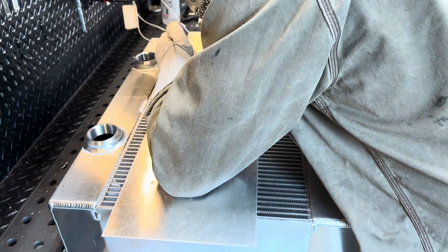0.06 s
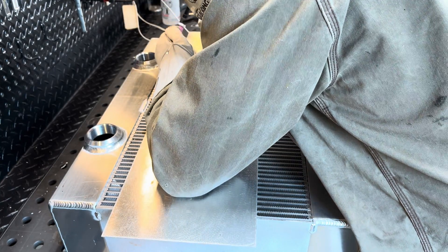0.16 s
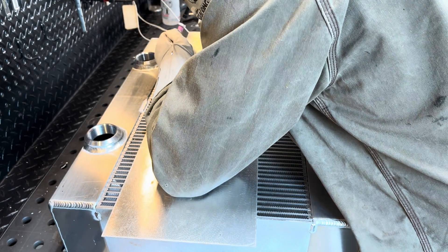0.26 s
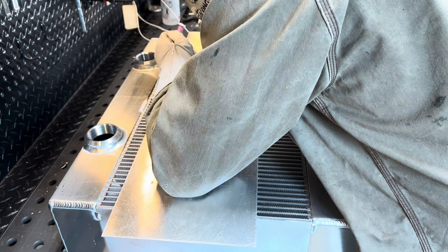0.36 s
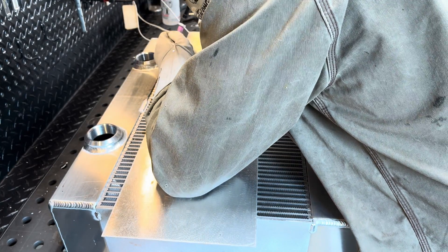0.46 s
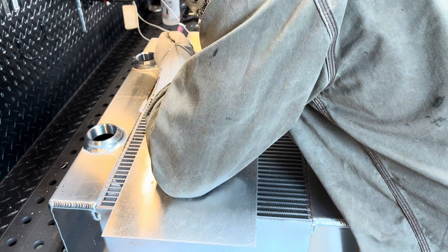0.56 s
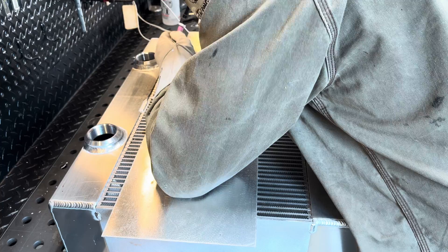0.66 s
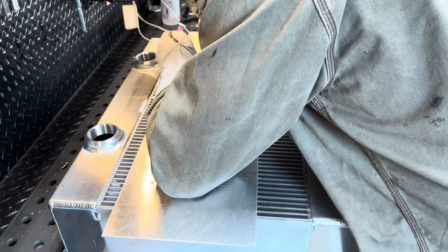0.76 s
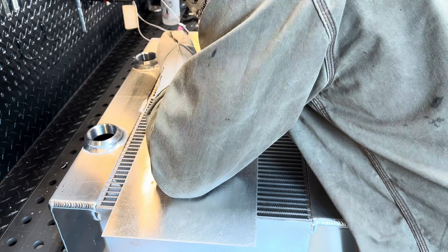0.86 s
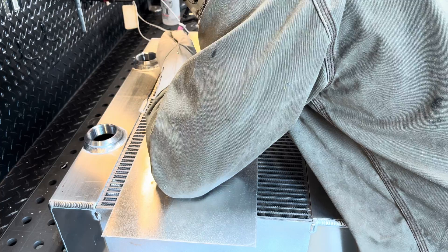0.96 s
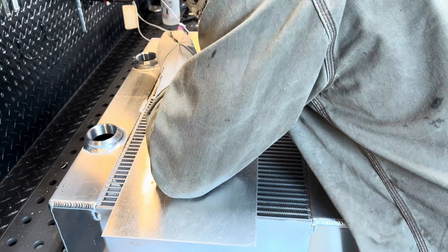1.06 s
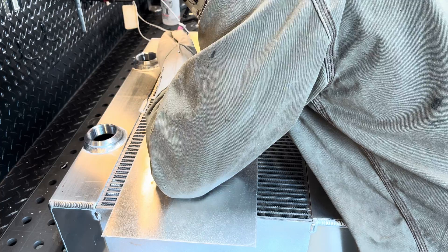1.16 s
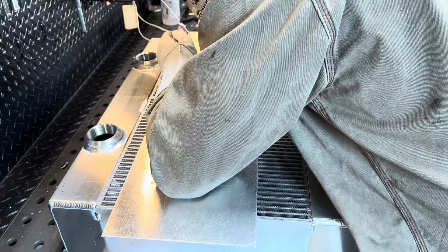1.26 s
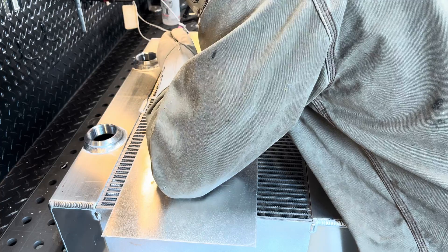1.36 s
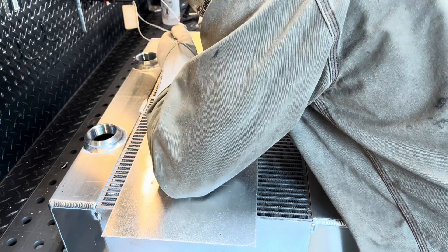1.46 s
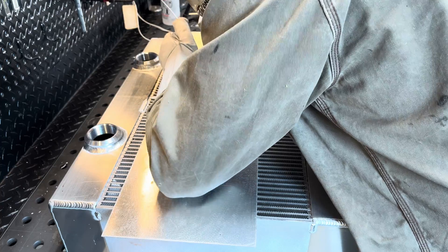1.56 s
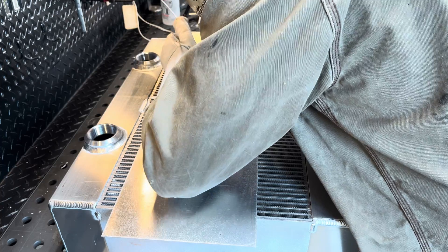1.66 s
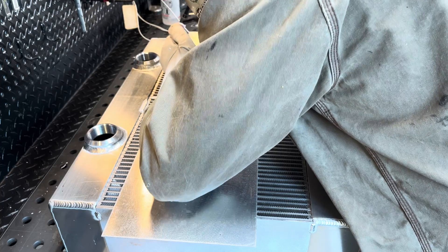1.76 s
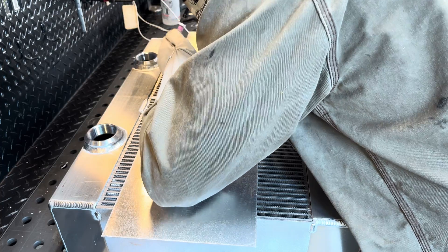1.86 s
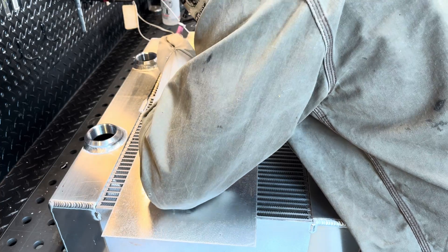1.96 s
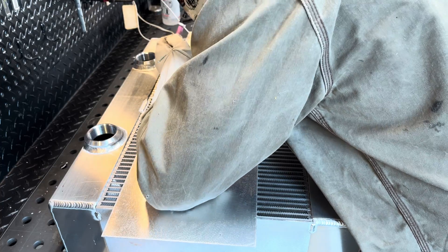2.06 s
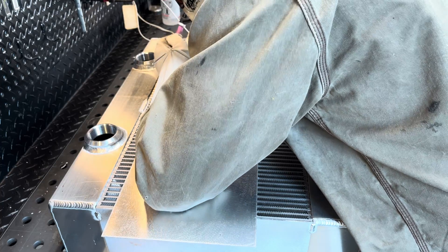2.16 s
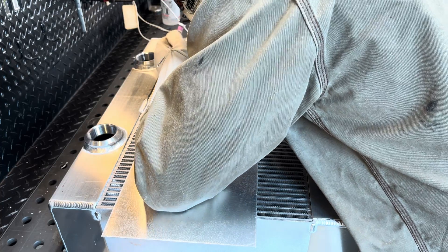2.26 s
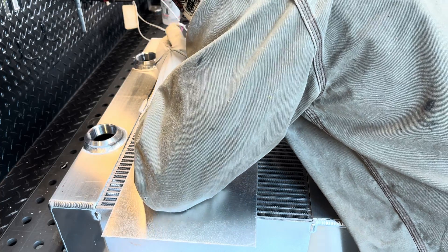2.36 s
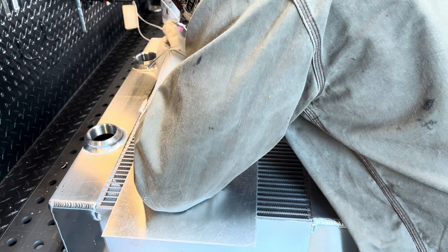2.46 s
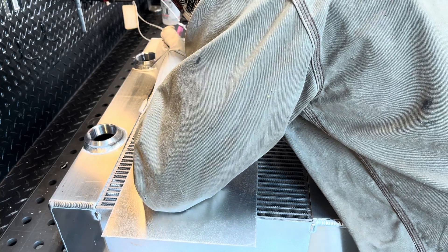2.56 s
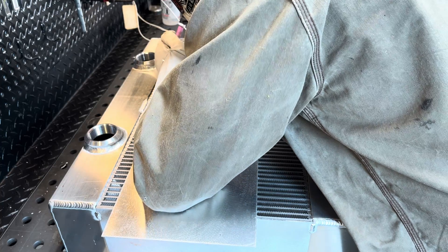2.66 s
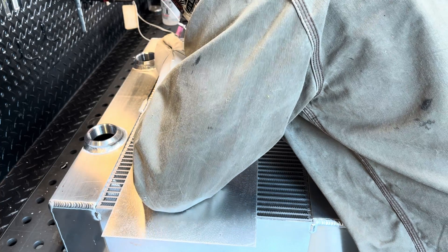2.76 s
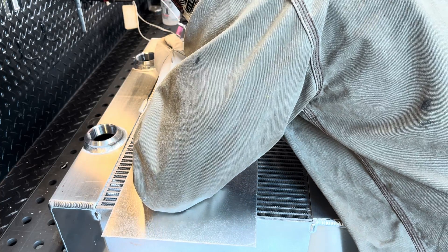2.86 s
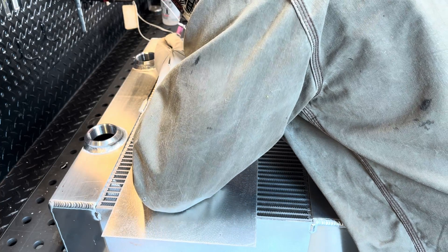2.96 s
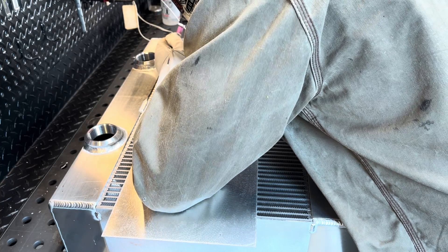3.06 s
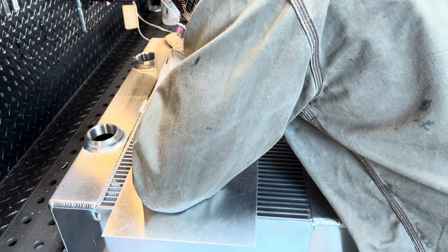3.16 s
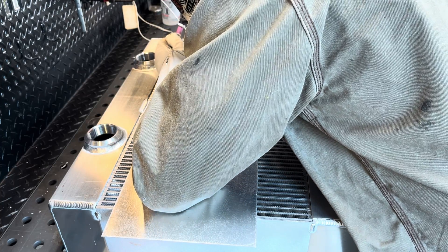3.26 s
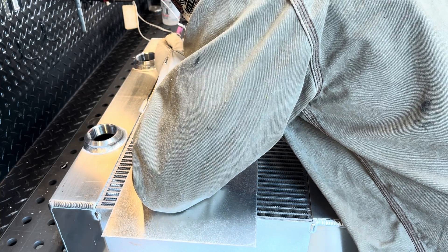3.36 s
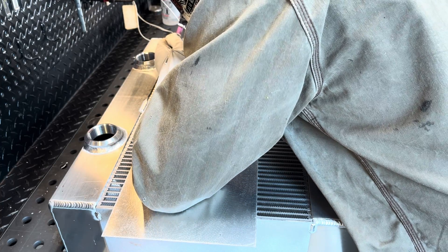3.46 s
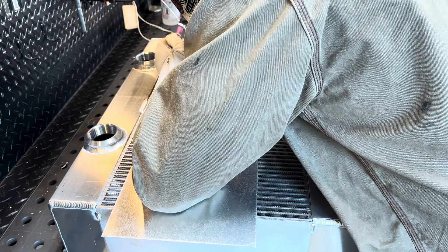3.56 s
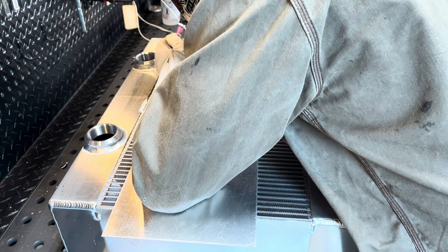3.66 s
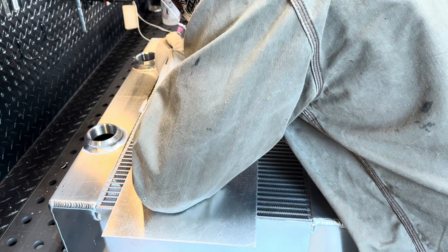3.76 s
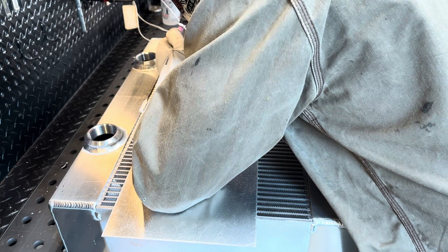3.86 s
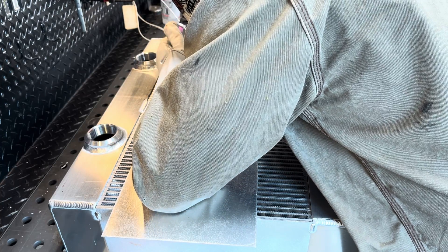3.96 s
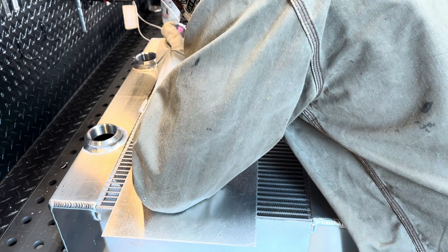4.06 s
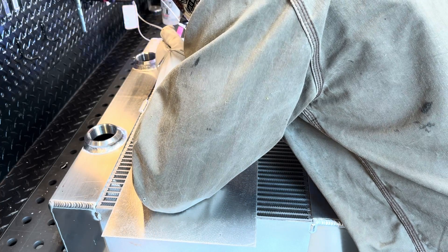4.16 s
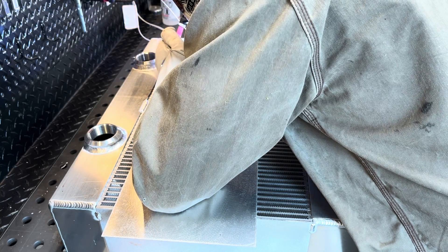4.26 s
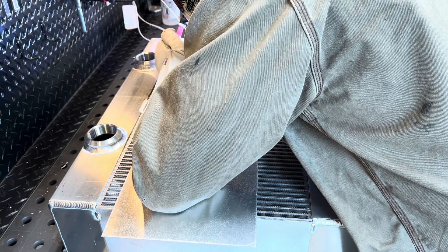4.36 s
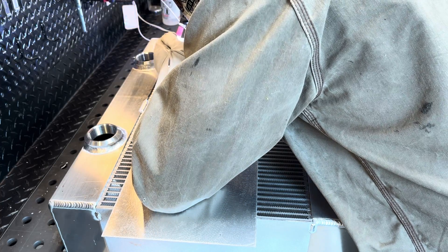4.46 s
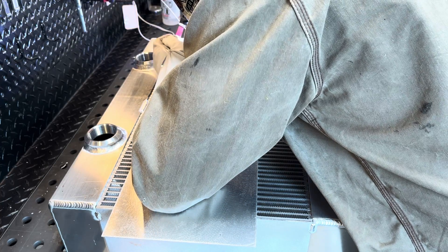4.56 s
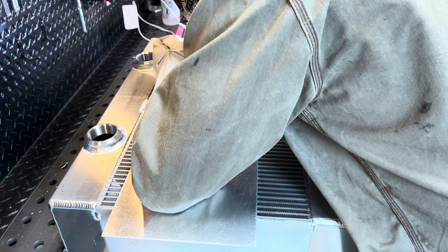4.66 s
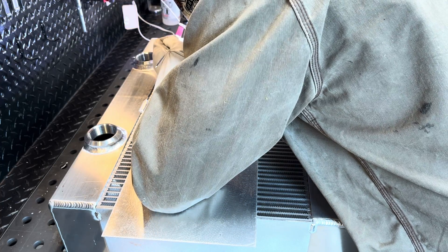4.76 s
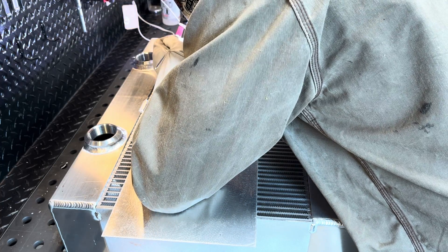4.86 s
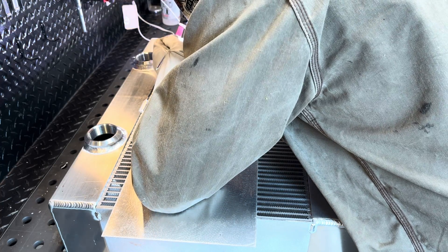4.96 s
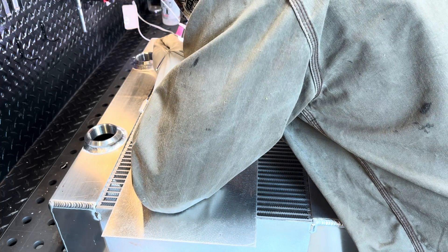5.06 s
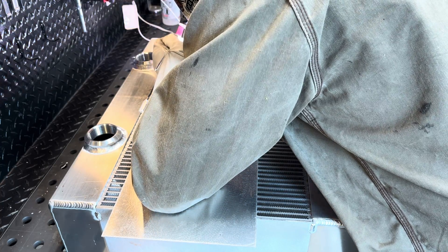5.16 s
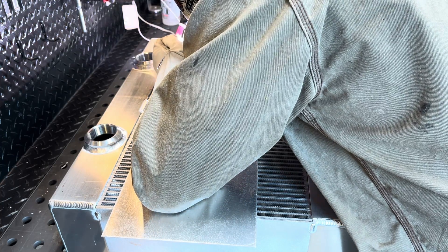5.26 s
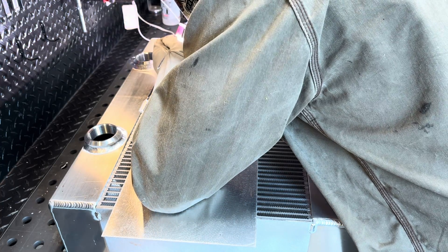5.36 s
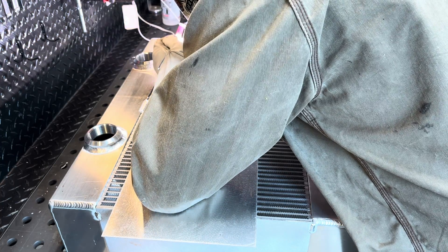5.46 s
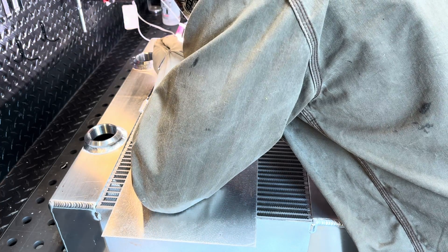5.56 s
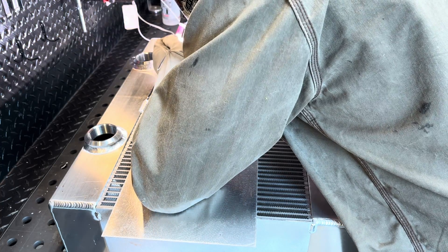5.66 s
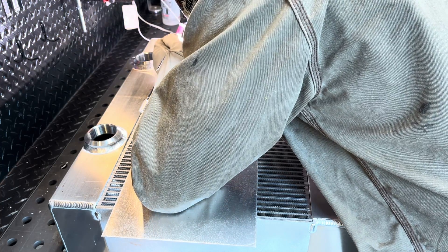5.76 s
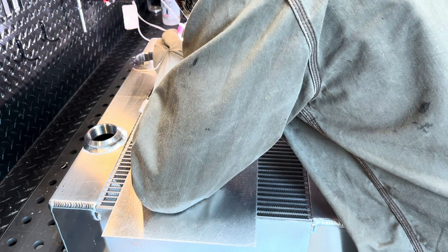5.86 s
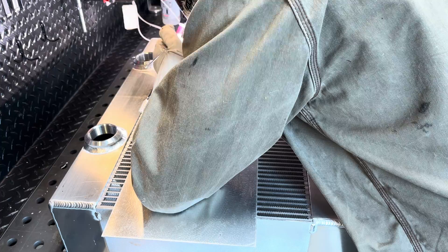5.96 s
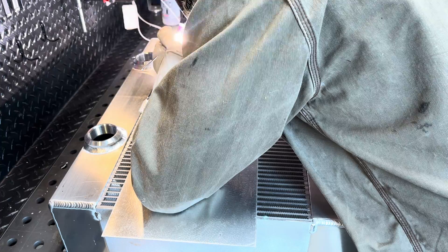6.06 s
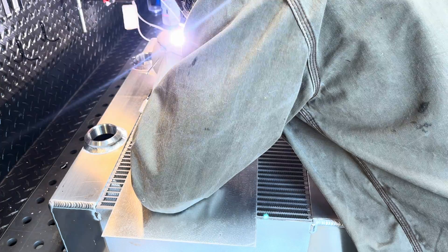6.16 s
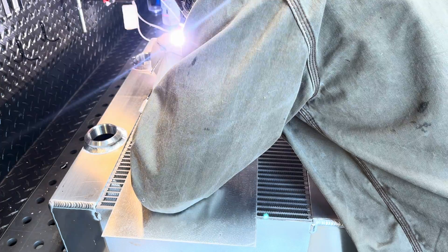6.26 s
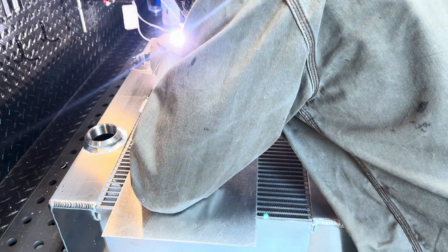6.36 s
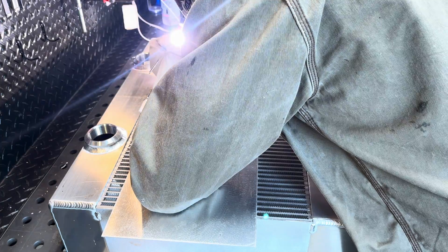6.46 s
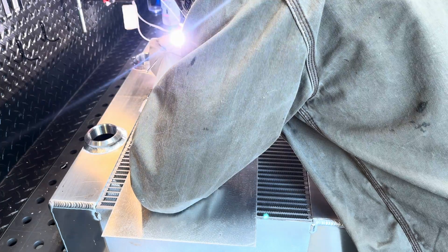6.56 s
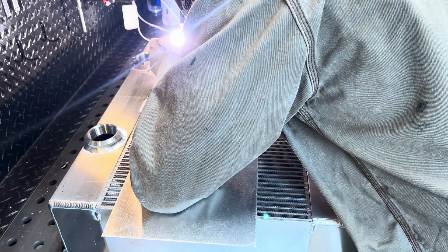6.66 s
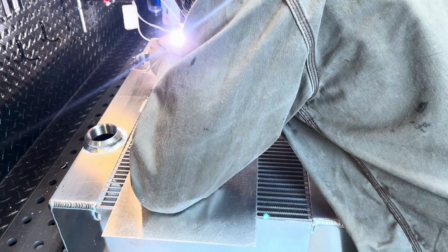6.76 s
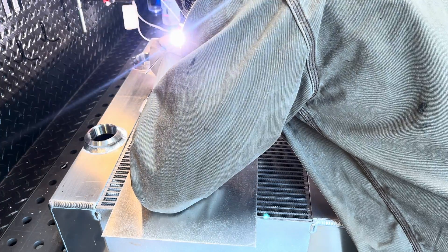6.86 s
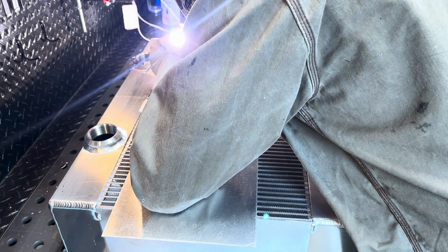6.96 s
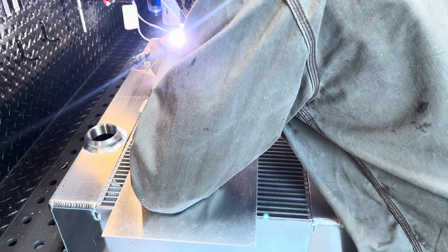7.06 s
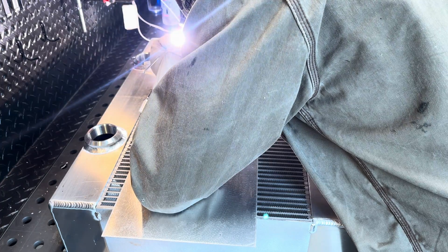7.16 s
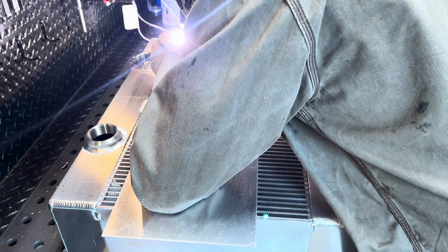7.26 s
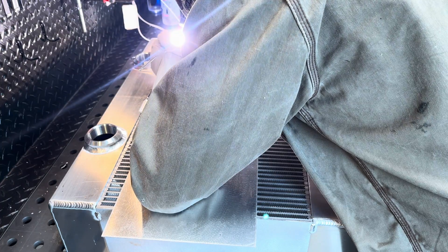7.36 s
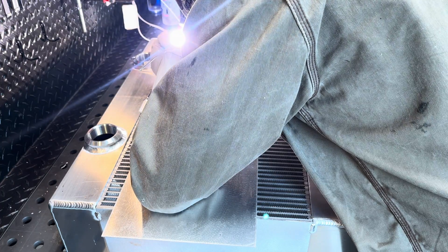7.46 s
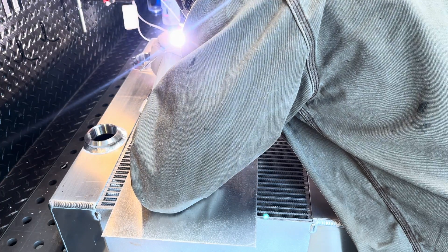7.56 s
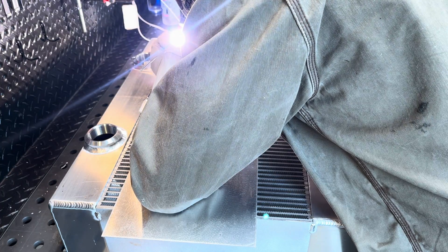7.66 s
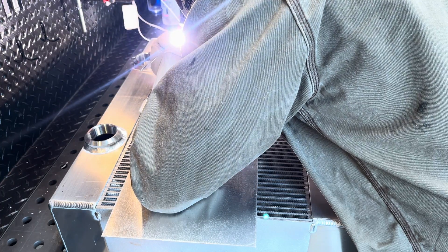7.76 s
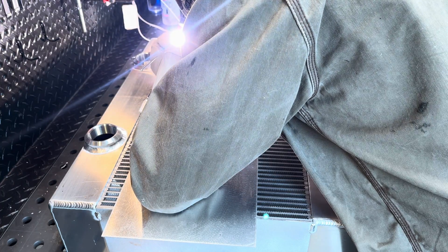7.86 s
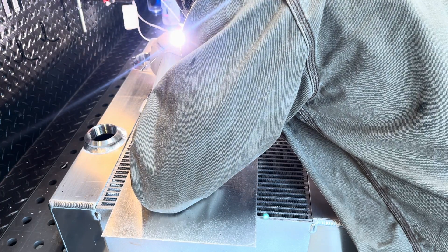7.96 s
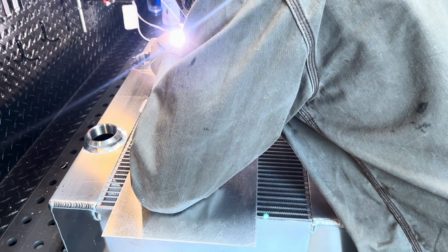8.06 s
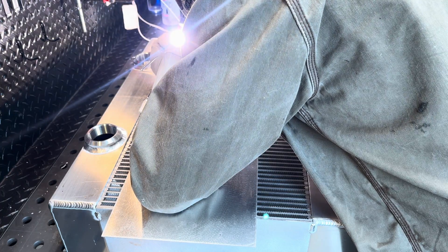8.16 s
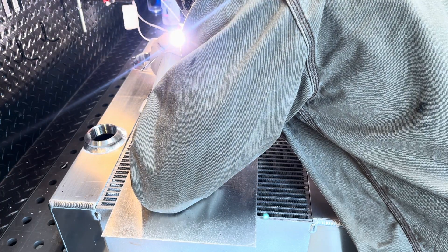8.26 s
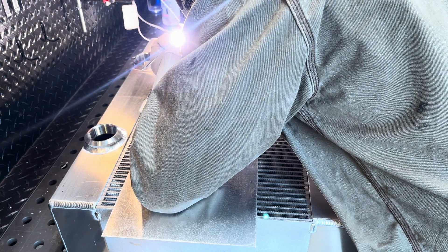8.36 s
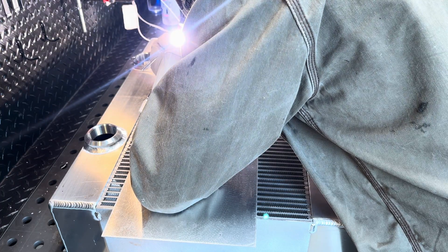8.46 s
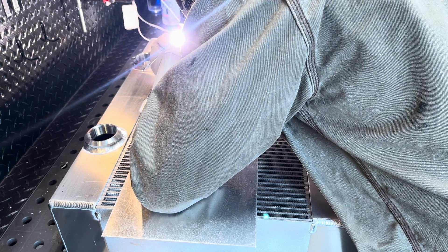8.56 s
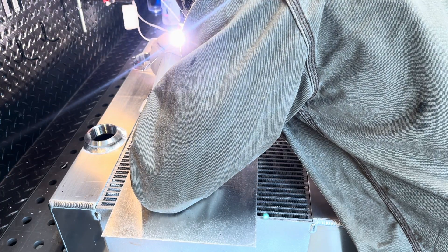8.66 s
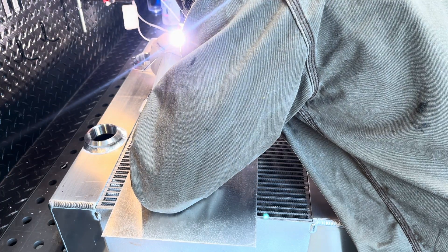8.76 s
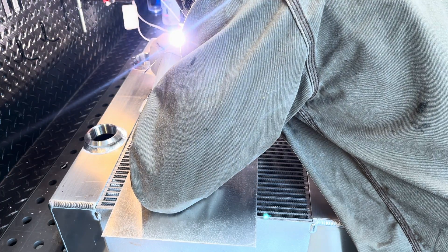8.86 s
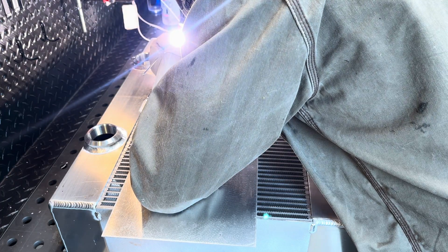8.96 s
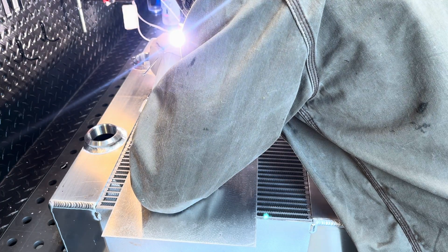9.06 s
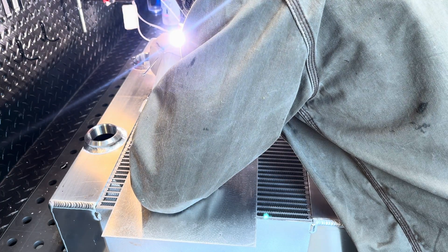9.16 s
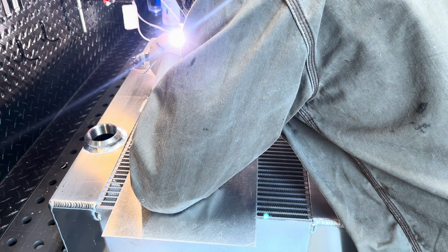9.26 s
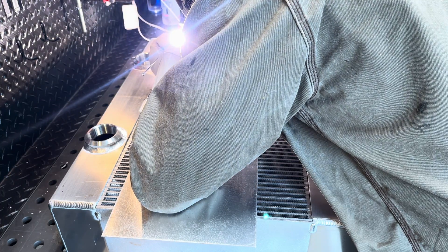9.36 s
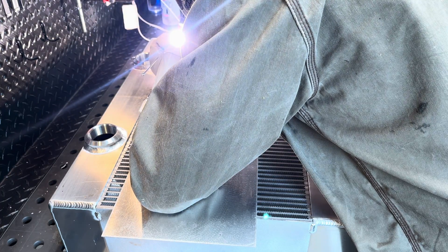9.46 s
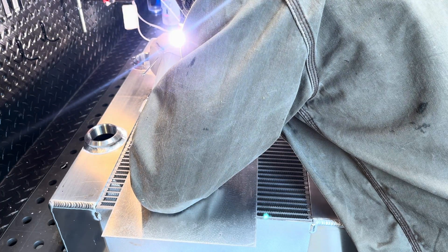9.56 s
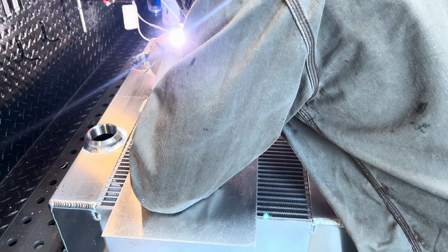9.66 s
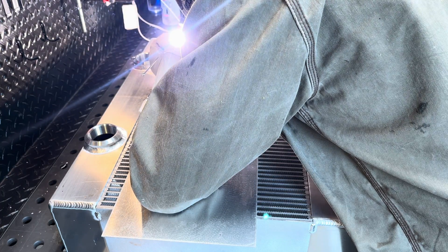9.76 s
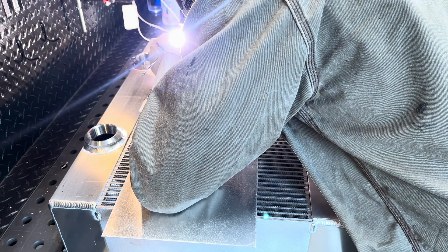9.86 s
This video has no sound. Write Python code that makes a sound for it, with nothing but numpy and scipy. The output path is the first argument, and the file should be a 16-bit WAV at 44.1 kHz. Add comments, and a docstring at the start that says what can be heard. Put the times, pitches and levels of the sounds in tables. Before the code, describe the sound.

A welding machine hums with fan air and a gas hiss, then sparks crackle and an arc catches into a harsh, loud, high buzz.

```python
"""An AC welding arc on an aluminium tank: it snaps at both polarity reversals of each cycle, over a thrum and sizzle.
The snaps echo off the metal close by, and the arc grows louder and harder as the weld pool heats up.
One pop and a burst of ignition sparks, cracks and thumps of heated air, come before it.
Earlier, shielding gas starts to hiss through the resonances of the torch cup, and torch and rod tick faintly.
Behind it all the machine hums with steady and wavering tones, and its fan blows noisy air."""
import sys
import numpy as np
from scipy import signal
from scipy.fft import rfft, irfft, next_fast_len
from scipy.io import wavfile
from scipy.ndimage import uniform_filter1d, map_coordinates

SR = 44100
rng = np.random.default_rng(int(sys.argv[2]) if len(sys.argv) > 2 else 0)


def put_to_file(sound):
    """Save the sound as 16-bit audio at rate SR, in the file named by the first command-line argument."""
    columns = np.atleast_2d(sound).T  # one column per channel
    safe = np.clip(columns, -1, 1)
    whole_steps = np.round(safe * 32767)
    wavfile.write(sys.argv[1], SR, whole_steps.astype(np.int16))


N = 437472
T = np.arange(N) / SR  # time of each sample in seconds

ARC_HZ = 198.007  # full cycles of the arc current per second
CATCH_S, CATCH_RISE_S = 4.36, 0.086  # the arc takes hold, and how long that takes
MELT_S = 5.8  # the pool is molten


def amp(db):
    """Decibels to gain."""
    return 10 ** (np.asarray(db) / 20)


def unit(x):
    """Scale to an rms (average strength) of 1."""
    return x / np.sqrt(np.mean(x ** 2) + 1e-20)


def along(points, hz):
    """Read a curve of (Hz, value) points on a logarithmic pitch axis."""
    point_hz, value = np.transpose(points)
    return np.interp(np.log(hz + 1), np.log(point_hz), value)


def curves(rows):
    """One value per sample for each column after the time."""
    time_s, *columns = np.transpose(rows)
    return [np.interp(T, time_s, column) for column in columns]


def ramp(start_s, length_s):
    """Rises from 0 to 1 over the given length."""
    return np.clip((T - start_s) / length_s, 0, 1)


def bumps(rows):
    """A dB curve of smooth bumps; each falls to 37% of its height one half length from its middle."""
    return sum(db * np.exp(-((T - middle_s) / half_s) ** 2) for middle_s, db, half_s in rows)


def wobble(rate):
    """A smooth random curve with the given number of random points per second."""
    return map_coordinates(rng.standard_normal(int(N * rate / SR) + 4), [T * rate])


def filtered(x, response):
    """Multiply the spectrum of x by a response, a function of frequency."""
    size = next_fast_len(N + SR // 4)
    return irfft(rfft(x, size) * response(np.fft.rfftfreq(size, 1 / SR)), size)[:N]


def coloured(x, spectrum, size=4096):
    """Give x the spectrum with a filter of unit energy that never rings ahead of the sound."""
    cepstrum = irfft(np.log(amp(along(spectrum, np.fft.rfftfreq(size, 1 / SR)))))
    # folding the second half onto the first puts the filter's energy as early as possible
    cepstrum[1:size // 2] *= 2
    cepstrum[size // 2 + 1:] = 0
    kernel = irfft(np.exp(rfft(cepstrum)))
    return signal.oaconvolve(x, kernel / np.linalg.norm(kernel))[:N]


def resonant_noise(modes, steepness=0.91):
    """Noise of rms 1 shaped by (Hz, width Hz, dB) resonances."""
    def response(f):
        power = 0
        for centre, width, db in modes:
            peak = (f * width) ** 2 / ((centre * centre - f * f) ** 2 + (f * width) ** 2)
            power = power + amp(db) ** 2 * peak ** steepness
        return np.sqrt(power)
    return unit(filtered(rng.standard_normal(N), response))


def pulses(times, sizes, order=8):
    """Smoothly drawn clicks at times that may fall between samples."""
    at = np.asarray(times)[:, None] * SR
    index = np.floor(at).astype(int) + np.arange(1 - order, order + 1)
    shape = np.sinc(index - at) * np.cos(np.pi * (index - at) / (2 * order)) ** 2
    weighted = shape * np.asarray(sizes)[:, None]
    return np.bincount(np.clip(index, 0, N).ravel(), weighted.ravel(), N + 1)[:N]


def scattered(x, tail_db, t60):
    """Every click trails a short burst of noise that falls by 60 dB in t60 seconds."""
    decay = amp(-60 * T[:SR // 4] / t60) ** 2
    power = np.abs(signal.oaconvolve(x ** 2, decay / decay.sum())[:N])
    return amp(tail_db) * np.sqrt(power) * rng.standard_normal(N)


def reflected(x, strength):
    """The direct sound plus delayed copies from the metal nearby."""
    # reflections from torch cup, tank and bench: delay_ms, signed gain (times strength)
    echoes = [(0.161, -0.97), (0.246, -0.4), (0.689, -0.64), (1.264, 0.074), (1.492, 0.72), (1.564, 0.21),
              (2.574, -.31), (2.769, 0.21), (2.828, -0.41)]

    def response(f):
        return 1 + strength * sum(gain * np.exp(-2j * np.pi * f * ms * 1e-3) for ms, gain in echoes)
    return filtered(x, response)


def fluttered(x):
    """Repeated bounces spread each snap in time and leave its colour alone."""
    # sound bouncing to and fro between tank, sleeve and bench: round_trip_ms, signed gain
    bounces = [(1.299, -0.31), (2.097, 0.14)]

    def response(f):
        product = 1
        for trip_ms, gain in bounces:
            delay = np.exp(-2j * np.pi * f * trip_ms * 1e-3)
            product = product * (gain + delay) / (1 + gain * delay)
        return product
    return filtered(x, response)


def pool_heat():
    """Heat of the metal (0-1): it climbs from the moment the arc catches until the pool is molten."""
    cold_heat, molten_heat = 0.39, 0.87
    return np.interp(T, [CATCH_S, MELT_S], [cold_heat, molten_heat], left=0)


def arc():
    """Current reversals buzz through the echoes of the work, each with a puff of sizzle, over a deep thrum."""
    # strength of the burning arc: time_s, relative level_db
    strength = [(4.44, -31.5), (4.79, -25), (5.03, -27.5), (5.43, -22.5), (5.84, -23), (6.19, -20),
                (6.93, -18.5), (7.39, -19.5), (9.92, -17.5)]
    # colour of a snap on cold and on molten metal: pitch_hz, relative level_db
    cold_colour = [(100, -23), (1000, -32), (2600, -27), (3300, -19.5), (4300, -3.5), (4750, 3),
                   (5500, -1.5), (6800, -5), (7500, -4.5), (8800, -4.5), (11000, -26), (13300, -22),
                   (15000, -37)]
    hot_colour = [(2000, -27.5), (2550, -11), (2800, -12.5), (3250, -3.5), (3900, -9), (4200, -4.5),
                  (4600, -8), (5400, -4.5), (6500, -1.5), (7500, 0.5), (8000, -10.5), (8800, -20.5),
                  (11000, -10.5), (13300, -16.5), (15200, -45.5)]
    # colour of the plasma's turbulent sizzle: pitch_hz, relative level_db (per Hz)
    sizzle_colour = [(100, -32), (600, -17), (1600, -17.5), (2600, -15), (3400, -6.5), (4500, -6.5),
                     (5800, -1.5), (6500, -1), (7900, -4.5), (8700, -6.5), (11000, -8), (12100, -6),
                     (13400, -5), (15000, -16)]
    # brief changes of the sizzle: middle_s, change_db, half_length_s
    flares = [(5.63, 4, 0.022), (7.218, -1, .008), (9.37, 3, .012)]
    heat = pool_heat()

    snaps = unit(reversals(heat, gap_ms=1.502, jitter_ms=0.002, scatter_db=0.46))
    echoed = fluttered(reflected(snaps, strength=0.78))
    # the snaps carry the treble; the low tones come from thrum()
    echoed = filtered(echoed, lambda f: np.interp(f, [2400, 2550], [0, 1]))
    buzz = (1 - heat) * coloured(echoed, cold_colour) + heat * coloured(echoed, hot_colour)
    buzz /= np.sqrt(uniform_filter1d(buzz ** 2, size=8820))  # even out the level over 0.2 s

    steady_noise = amp(-9.5 + 0.31 * wobble(21)) * rng.standard_normal(N)
    puffs = scattered(snaps, tail_db=-21.5, t60=.002) + steady_noise
    sizzle = coloured(reflected(puffs, strength=0.2), sizzle_colour)
    sound = buzz + amp(bumps(flares) - 1.0) * sizzle

    # the top treble is duller around the moment of melting
    treble = filtered(sound, lambda f: np.interp(f, [7800, 9000], [0, 1]))
    treble_db = -1.5 + bumps([(MELT_S, -1.8, 0.49)])
    sound = sound + (amp(treble_db) - 1) * treble

    strength_db, = curves(strength)
    level = ramp(CATCH_S, CATCH_RISE_S) * amp(strength_db - 0.2 + 0.38 * wobble(25))
    return level * sound + thrum(level * heat)


def reversals(heat, gap_ms, jitter_ms, scatter_db):
    """Two snaps per current cycle, one at each reversal; the second grows as the pool heats."""
    cycle_s = np.arange(int(N / SR * ARC_HZ)) / ARC_HZ
    chance = rng.standard_normal((4, len(cycle_s)))
    first_s = cycle_s + jitter_ms * chance[0] * 1e-3
    second_s = cycle_s + (gap_ms + jitter_ms * chance[2]) * 1e-3
    second_size = np.interp(np.interp(cycle_s, T, heat), [0, 1], [-.12, .43])
    first_snaps = pulses(first_s, amp(scatter_db * chance[1]))
    return first_snaps + pulses(second_s, second_size * amp(scatter_db * chance[3]))


def thrum(molten):
    """The arc column swells with each cycle: a deep tone on cold metal, a thinner, wavering one over the pool."""
    # low partials of the arc: multiple of the cycle rate, cold_db (within the thrum),
    # molten_db (against the buzz level times the heat)
    partials = [(1, -10, -29.5), (2, -5.5, -29), (3, -7.5, -30.5), (4, -7.5, -35), (5, -10.5, -43),
                (6, -22, -29.5), (7, -17.5, -23.5), (9, -21, -27.5), (10, -20, -18), (11, -18.5, -28.5),
                (12, -13, -25.5)]
    # the lowest partials swell and sink: middle_s, change_db, half_length_s
    low_swells = [(4.57, 3, .08), (5.42, -4, .07), (5.87, -3, 0.082), (6.7, 3, 0.46), (7.25, -11, 0.23)]
    # how much of those swells a partial takes; the middle ones rise as the lowest sink: pitch_hz, share
    swell_share = [(400, 0.79), (600, .15), (800, -0.32), (1400, -.05)]
    # on cold metal the tone swells, fades as the metal warms, and collapses on melting
    peak_s, peak_db, molten_floor_db = 4.56, -32, -49
    rise_db_per_s, fade_db_per_s, collapse_s = 40, 7, 0.032

    age = T - peak_s
    arch_db = peak_db + np.minimum(rise_db_per_s * age, -fade_db_per_s * age)
    melted = ramp(MELT_S, collapse_s)
    cold_level_db = (1 - melted) * arch_db + melted * molten_floor_db + 0.53 * wobble(15)
    cold = ramp(CATCH_S, CATCH_RISE_S) * amp(cold_level_db)
    swell_db = bumps(low_swells)
    tone = 0
    for multiple, cold_db, molten_db in partials:
        hz = multiple * ARC_HZ
        level = np.hypot(cold * amp(cold_db), molten * amp(molten_db + 1.2 * wobble(3)))
        level = level * amp(swell_db * along(swell_share, hz))
        tone = tone + level * np.sqrt(2) * np.cos(2 * np.pi * (hz * T + rng.random()))
    return tone


def ignition():
    """Sparks jump the gap: each is a crack and a thump of heated air, over a sputter of small ones."""
    # the loudest ignition sparks: time_s, relative level_db
    sparks = [(4.0448, -10), (4.0621, -5), (4.0663, 1), (4.0786, -1), (4.0854, -1.5), (4.131, -3),
              (4.152, 2.5), (4.1694, -6), (4.1869, -5), (4.2173, 0.5), (4.2429, -6), (4.288, -2),
              (4.307, 0.5), (4.3335, -4), (4.379, -3), (4.4023, -9), (4.4121, -9)]
    # colour of the cracks and of the thumps: pitch_hz, relative level_db (per Hz)
    crack_colour = [(35, -63), (60, -24), (197, -2), (361, -24), (396, -6), (778, -0.5), (937, -12),
                    (1010, -5.5), (1600, -8), (1970, -1), (2120, -8.5), (3370, 1.5), (3790, -6.5),
                    (6330, 1.5), (15700, -17)]
    thump_colour = [(60, -22), (170, -4), (260, 0), (340, -17), (600, -4), (1100, -5), (2000, -12),
                    (3500, -14), (8000, -19.5), (15000, -34)]

    time_s, level_db = np.transpose(sparks)
    cracks = pulses(time_s, -amp(level_db + 2.5))
    # thumps vary less than cracks and gain up to 20 dB as the arc catches
    caught = np.interp(time_s, T, ramp(CATCH_S, CATCH_RISE_S))
    thumps = pulses(time_s, -amp(-10 + 0.56 * level_db + 20 * caught)) + lone_pop(length_ms=0.47)
    small = sputter(spread_db=7.5)
    sharp = cracks + scattered(cracks, tail_db=1.5, t60=0.021)
    sharp = sharp + small + scattered(small, tail_db=2.0, t60=0.014)
    dull = thumps + amp(-11.0) * small
    dull = dull + scattered(dull, tail_db=-1.5, t60=0.026)
    return coloured(reflected(sharp, strength=0.064), crack_colour) + coloured(dull, thump_colour)


def lone_pop(length_ms):
    """The first spark pushes the air out, and it snaps back."""
    # the first lone pop: time_s, relative level_db
    pop = (3.990, -3.5)
    time_s, level_db = pop
    return pulses([time_s, time_s + length_ms * 1e-3], amp(level_db + 3) * np.array([.7, -1]))


def sputter(spread_db, count=210):
    """Small sparks of random size until the arc has caught; each flurry starts at once, holds and dies away."""
    # flurries of small sparks: start_s, length_s, relative level_db
    flurries = [(4.044, 0.051, -22), (4.11, 0.1, -19), (4.234, 0.081, -20.5), (4.329, .015, -22),
                (4.361, .05, -19.5)]
    fade_db_per_s = 330

    place, size = rng.random((2, count))
    start, end = flurries[0][0], CATCH_S + CATCH_RISE_S
    times = start + (end - start) * (np.arange(count) + place) / count
    levels = []
    for start_s, length_s, level_db in flurries:
        fade_db = fade_db_per_s * np.maximum(T - start_s - length_s, 0)
        levels.append((T >= start_s) * amp(level_db - fade_db))
    return pulses(times, -amp(spread_db * size + 6.5)) * np.max(levels, axis=0)


def gas():
    """Argon rushes from the cup and echoes off the metal; its resonances shift as the torch moves to the seam."""
    # resonances between cup and metal, before and after the move: pitch_hz, width_hz (about), relative level_db
    cup_away = [(3470, 240, -1.5), (4070, 150, 1.5), (4700, 210, -2.5), (6980, 440, -4), (7900, 250, -2.5),
                (8450, 300, -2.5), (9250, 250, -12), (10050, 200, -4.5), (10740, 160, 0.5),
                (11600, 400, -6), (13100, 1200, -10)]
    cup_near = [(3370, 360, -0.5), (4180, 210, 0), (4860, 300, -9), (6550, 400, -9.5), (7100, 250, -3.5),
                (7780, 300, 0.5), (8450, 400, -2.5), (10240, 250, -4), (10940, 540, -3.5), (12500, 300, -9),
                (13400, 900, -12)]
    # the torch is moved to the seam: start_s, end_s
    torch_move = (1.6, 2.1)
    open_s, rise_s = .345, 0.14  # the valve opens and the flow builds up
    surge_db, surge_decay_s = 4, 0.41  # first rush from the hose, and the time it takes to fall to 37%
    flow_db, heated_db = -50, 9  # settled level, and extra hiss at a heat of 1

    surge = np.exp(-np.maximum(T - open_s, 0) / surge_decay_s)
    flow = ramp(open_s, rise_s) * amp(flow_db + surge_db * surge + heated_db * pool_heat())
    moved = np.interp(T, torch_move, [0, 1])
    hiss = np.sqrt(1 - moved) * resonant_noise(cup_away) + np.sqrt(moved) * resonant_noise(cup_near)
    tilt = [(1000, -6), (3300, -2.0), (13500, 0.0), (15500, -5.0)]  # (Hz, dB)
    return flow * unit(coloured(reflected(hiss, strength=0.14), tilt))


def touches():
    """Faint ticks and scrapes, fading resonant noise, as torch and filler rod are brought into place."""
    # light touches of torch and rod: start_s, level_db (at the start), pitch_hz, width_hz (about),
    # t60_s (time to fall by 60 dB)
    contacts = [(1.317, -50, 5200, 2500, .05), (1.317, -41, 3200, 110, .09), (1.514, -48, 2000, 1500, 0.31),
                (1.574, -44, 7000, 3500, .04), (1.64, -50, 1900, 900, .35)]
    sound = 0
    for start_s, level_db, hz, width_hz, t60_s in contacts:
        fade = (T >= start_s) * amp(-60 * np.abs(T - start_s) / t60_s)
        sound = sound + amp(level_db) * fade * resonant_noise([(hz, width_hz, 0)])
    return sound


def machine():
    """A steady transformer hum and wavering fan tones in rushing air."""
    # transformer and fan tones: pitch_hz, level_db (rms), unsteadiness
    hum = [(120.1, -48.5, 0.037), (359.5, -51.5, 1), (425, -63.5, 0.54), (553, -56.5, 1),
           (611, -61.5, 0.83), (723, -73.5, .6), (1397, -64.5, 0.84), (2270, -76, .4), (2290, -75.5, 0.27),
           (2316, -66, 0.33)]
    # colour of the fan's air in the shop: pitch_hz, relative level_db (per Hz)
    fan_colour = [(25, -15), (55, -8), (85, -5.5), (160, -5), (260, 2.5), (450, -2.5), (620, -1),
                  (950, -5.5), (1400, -6), (1700, -11.5), (2350, -13), (3000, -18.5), (7000, -24),
                  (15000, -54)]
    tones = 0
    for hz, level_db, unsteadiness in hum:
        drift = 1 + unsteadiness * (wobble(12) + 1j * wobble(12))  # wavers in strength and phase
        tones = tones + amp(level_db) * unit(np.real(drift * np.exp(2j * np.pi * hz * T)))
    air = coloured(rng.standard_normal(N), fan_colour)
    return tones + amp(-47.5 + 0.97 * wobble(5)) * air


def shop(x):
    """The diffuse answer of the workshop: a noise tail that dies away sooner in the treble."""
    # echo time of the workshop: pitch_hz, t60_s (time to fall by 60 dB)
    decay_times = [(200, 0.47), (2000, 0.2), (12000, 0.18)]
    hz, t, noise = signal.stft(rng.standard_normal(SR // 2), SR, nperseg=256)
    fading = noise * amp(-60 * t / along(decay_times, hz)[:, None])
    tail = signal.istft(fading, SR, nperseg=256)[1]
    return signal.oaconvolve(x, tail / np.linalg.norm(tail))[:N]


def scene():
    """All sources together; the torch is close, so only the sparks wake the room."""
    sparks = ignition()
    return (arc() + sparks + amp(-8) * shop(sparks) + gas() + touches() + machine())[None]


def record(dry):
    """The recorder rounds the highest peaks and keeps nothing above its band limit."""
    ceiling, top_hz = .86, 15750
    rounded = dry[0] / (1 + np.abs(dry[0] / ceiling) ** 6) ** (1 / 6)
    return filtered(rounded, lambda hz: hz < top_hz)[None]


dry = scene()
out = record(dry)
put_to_file(out)
```